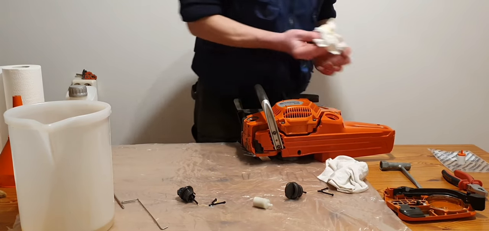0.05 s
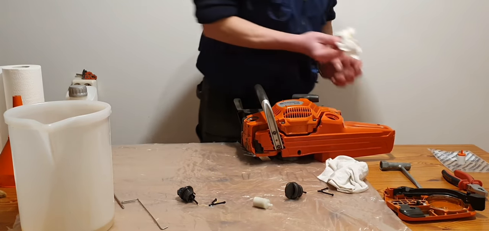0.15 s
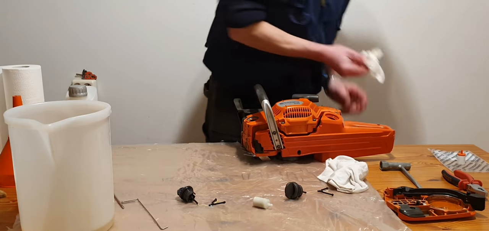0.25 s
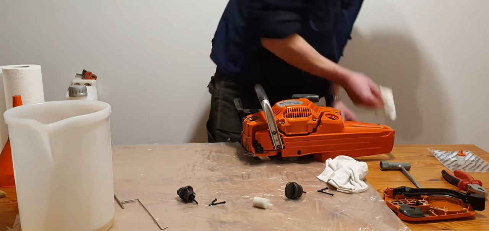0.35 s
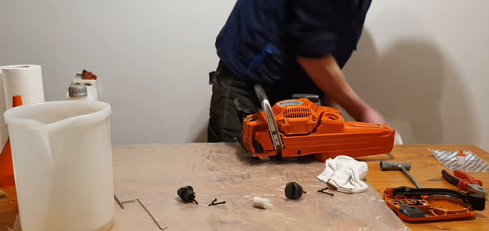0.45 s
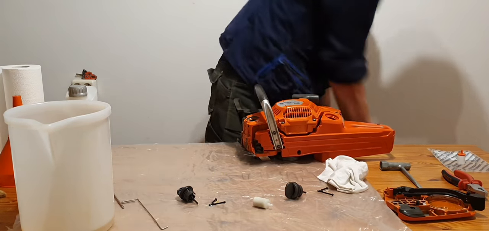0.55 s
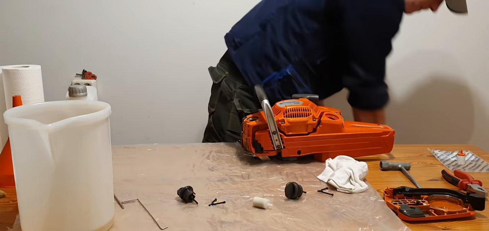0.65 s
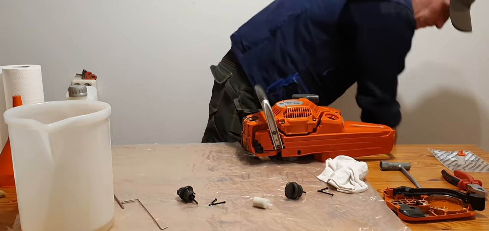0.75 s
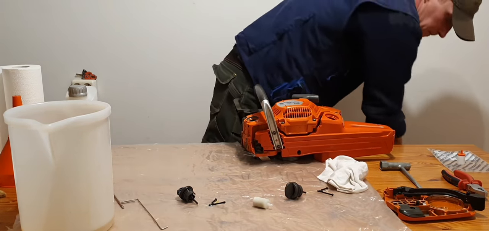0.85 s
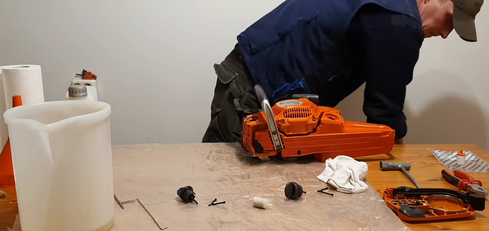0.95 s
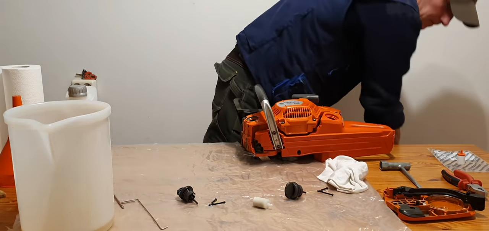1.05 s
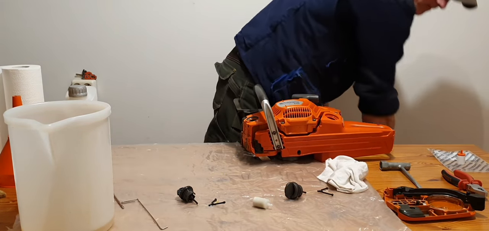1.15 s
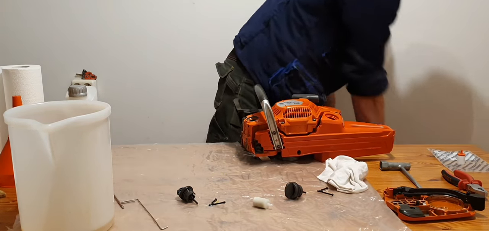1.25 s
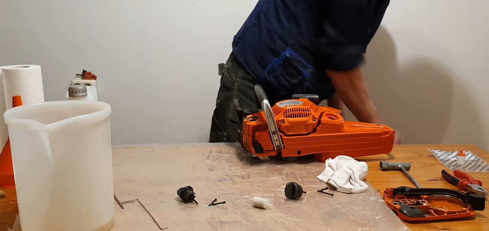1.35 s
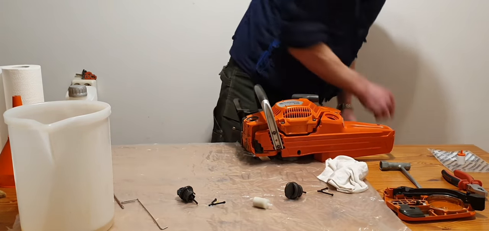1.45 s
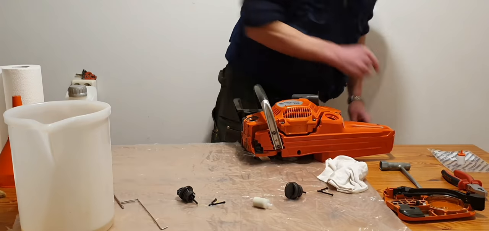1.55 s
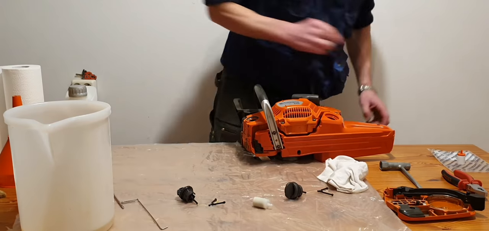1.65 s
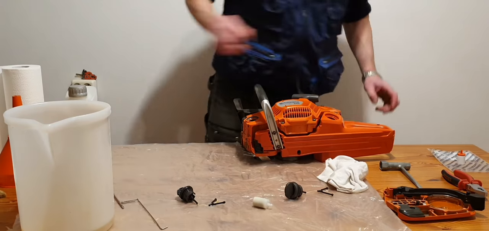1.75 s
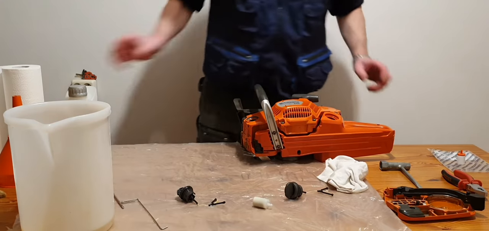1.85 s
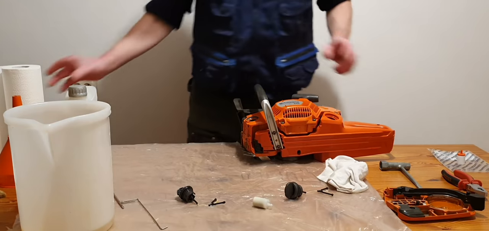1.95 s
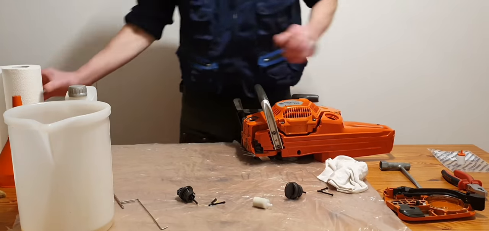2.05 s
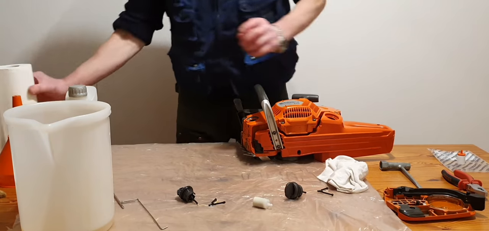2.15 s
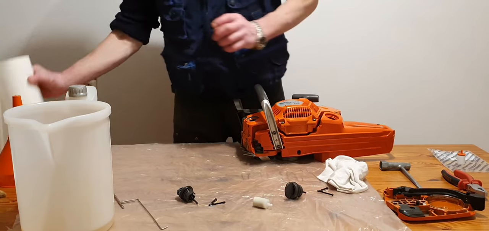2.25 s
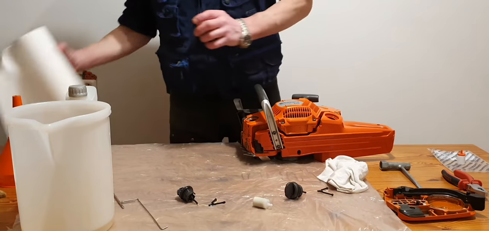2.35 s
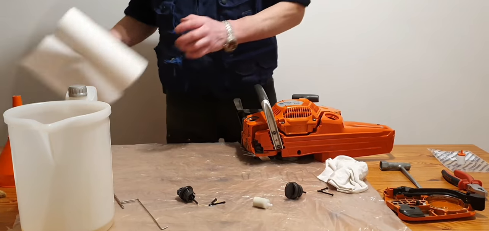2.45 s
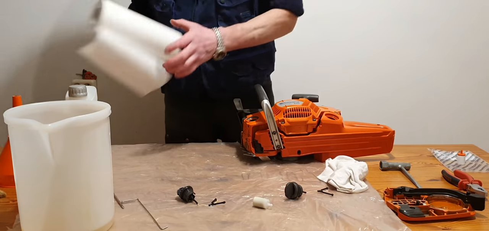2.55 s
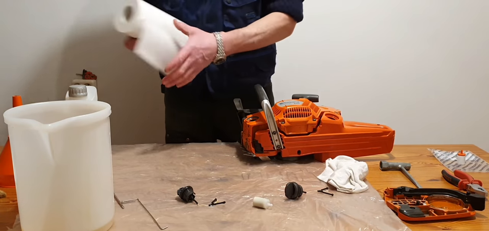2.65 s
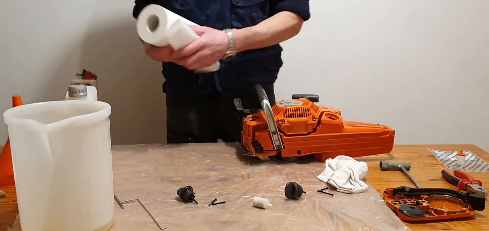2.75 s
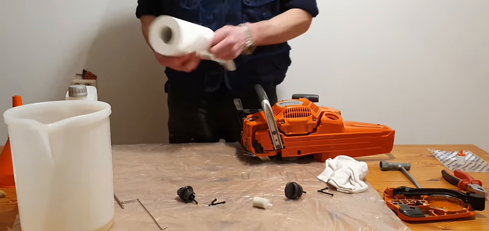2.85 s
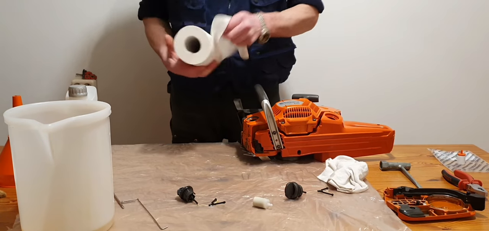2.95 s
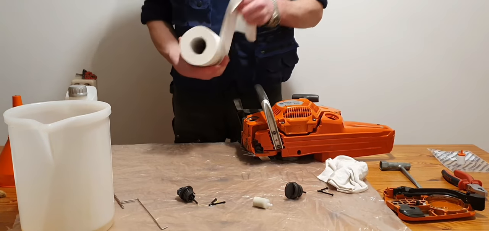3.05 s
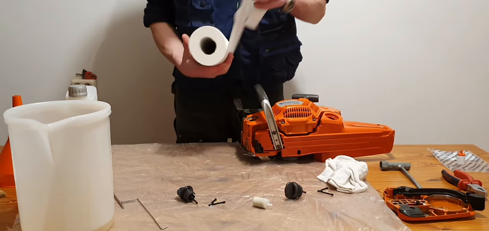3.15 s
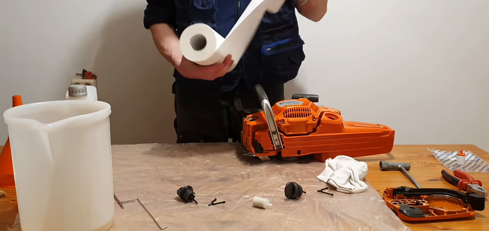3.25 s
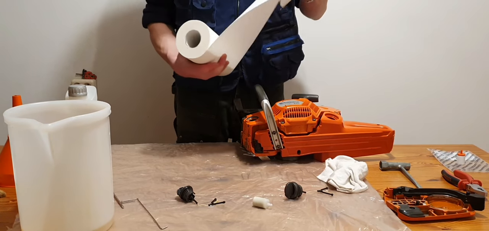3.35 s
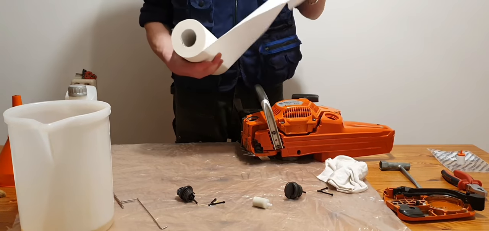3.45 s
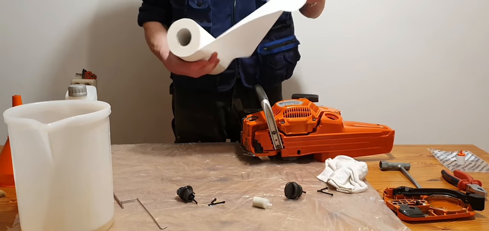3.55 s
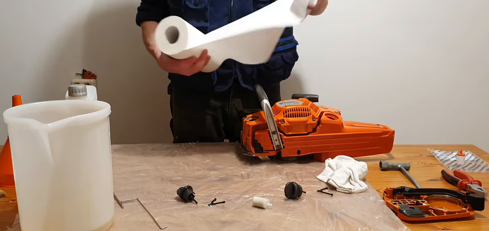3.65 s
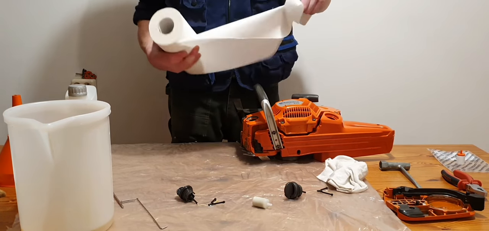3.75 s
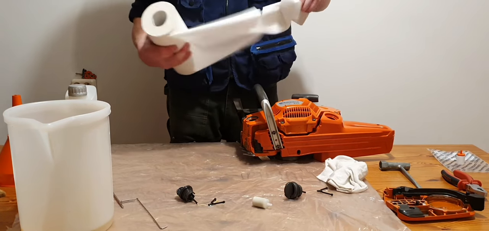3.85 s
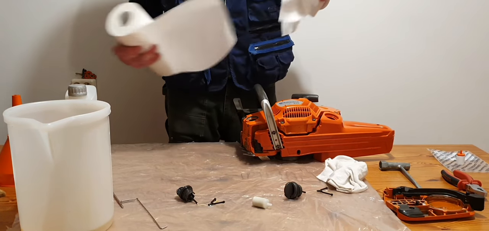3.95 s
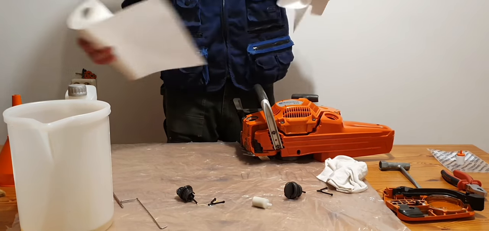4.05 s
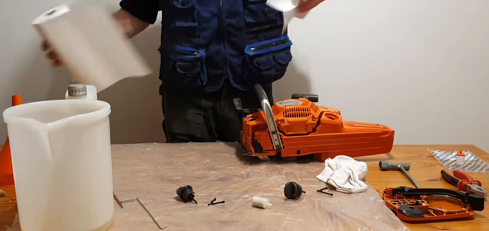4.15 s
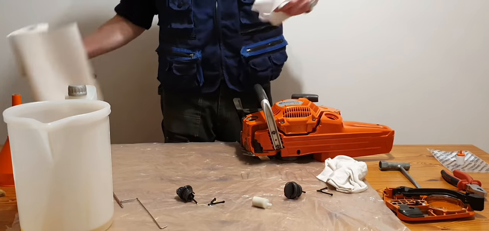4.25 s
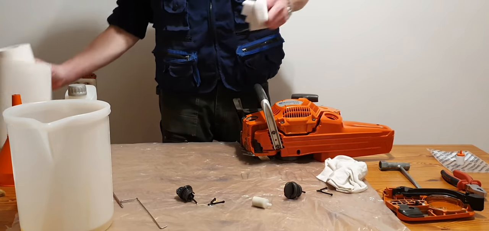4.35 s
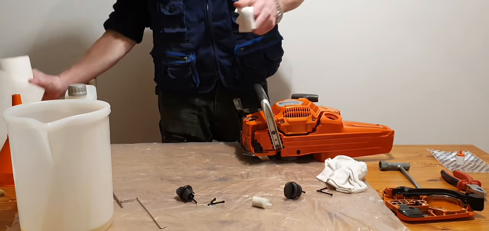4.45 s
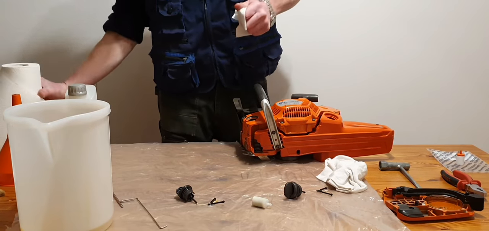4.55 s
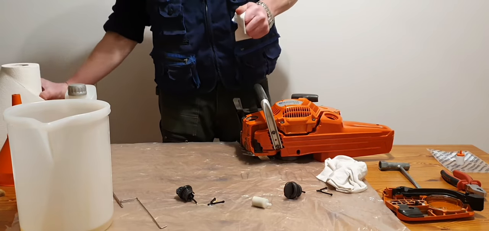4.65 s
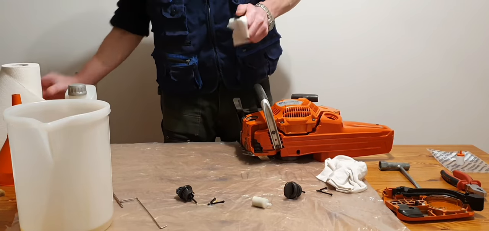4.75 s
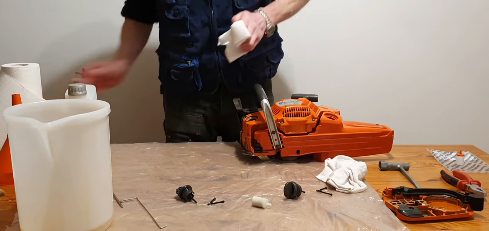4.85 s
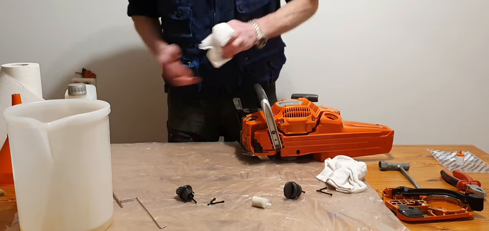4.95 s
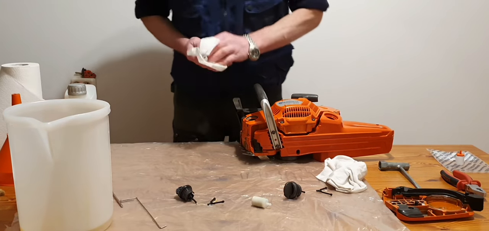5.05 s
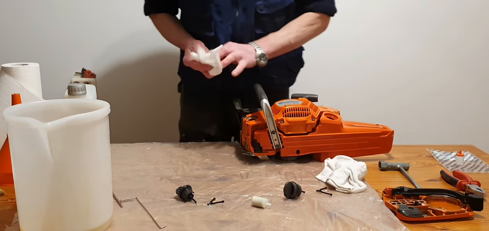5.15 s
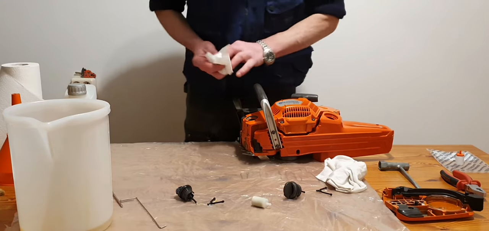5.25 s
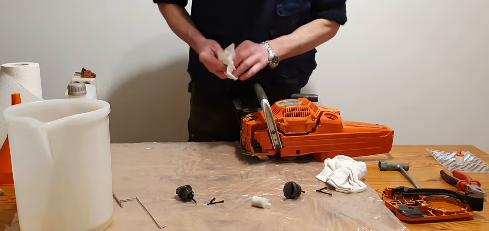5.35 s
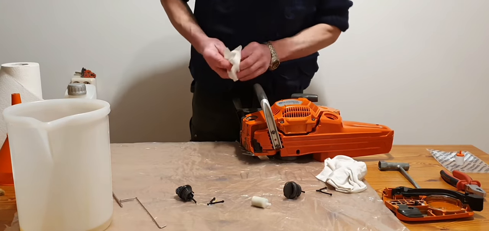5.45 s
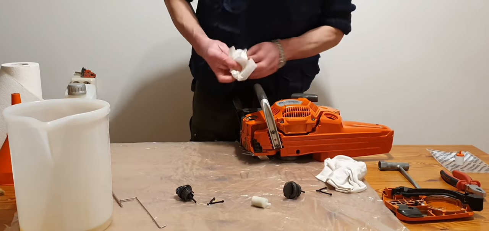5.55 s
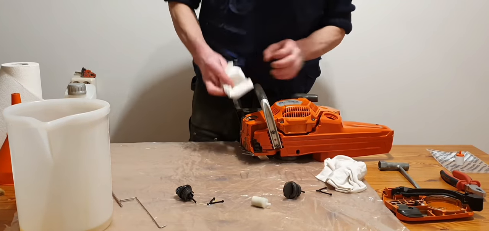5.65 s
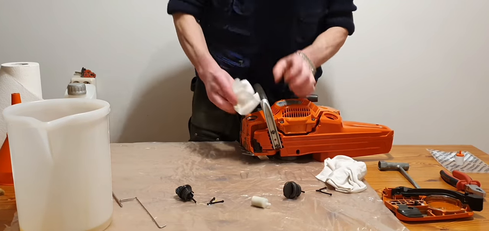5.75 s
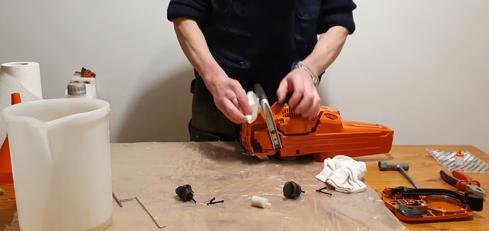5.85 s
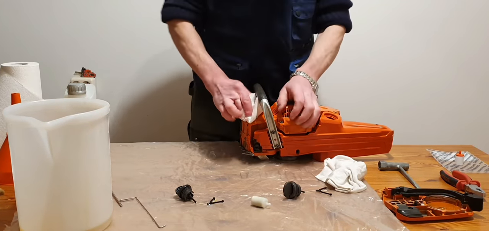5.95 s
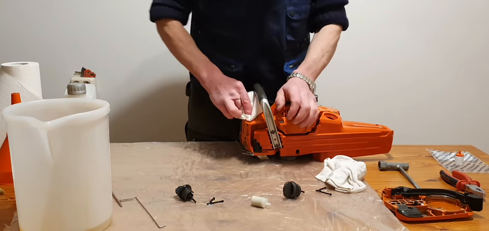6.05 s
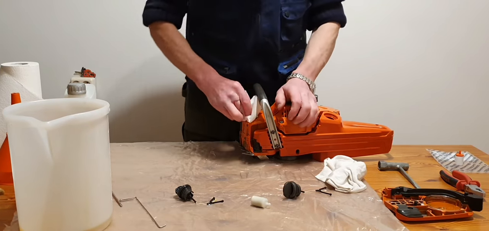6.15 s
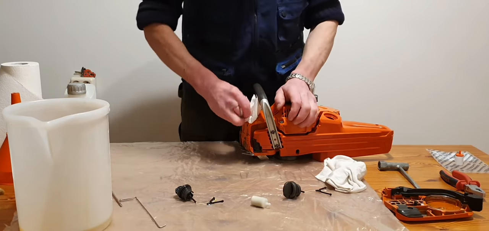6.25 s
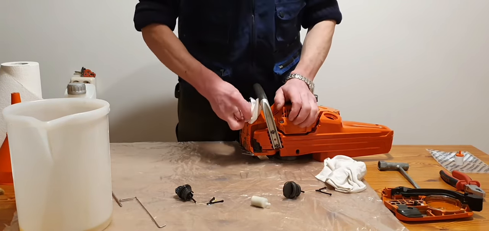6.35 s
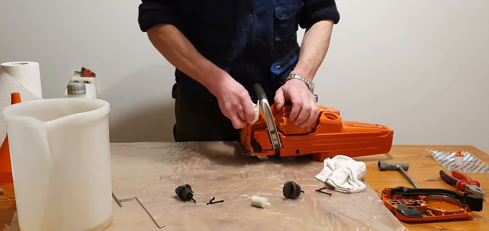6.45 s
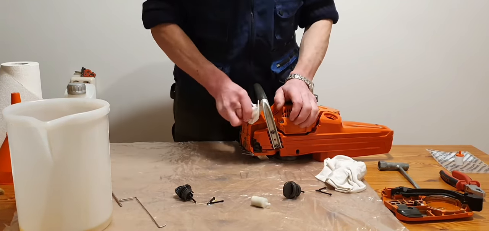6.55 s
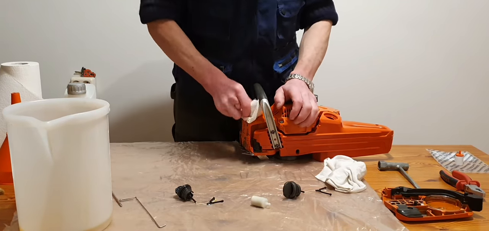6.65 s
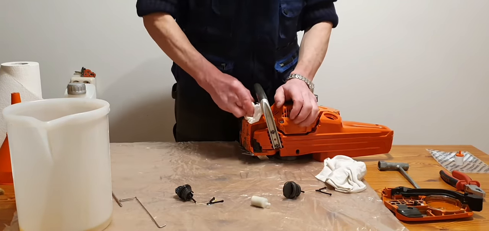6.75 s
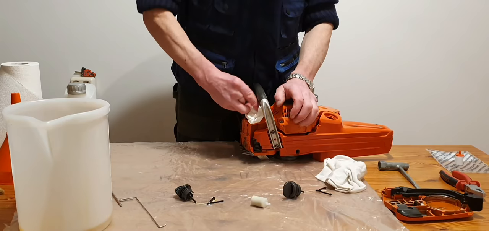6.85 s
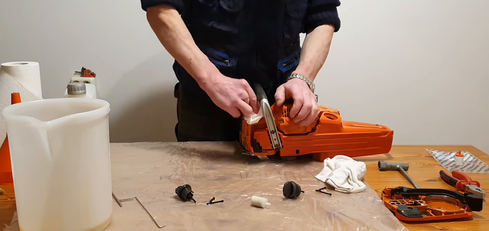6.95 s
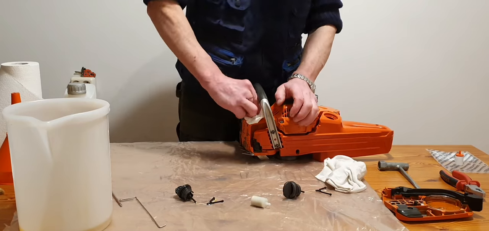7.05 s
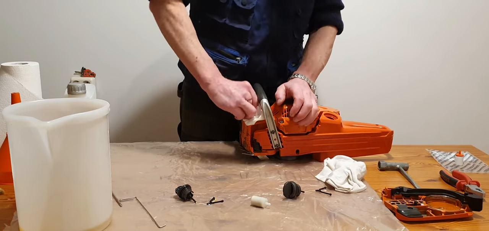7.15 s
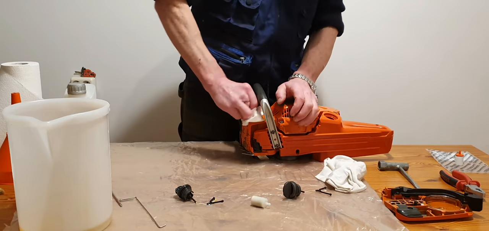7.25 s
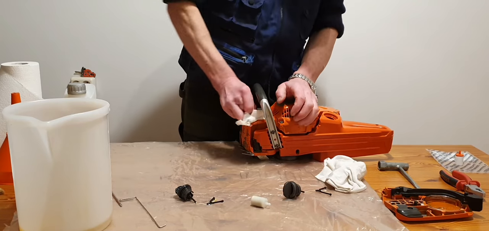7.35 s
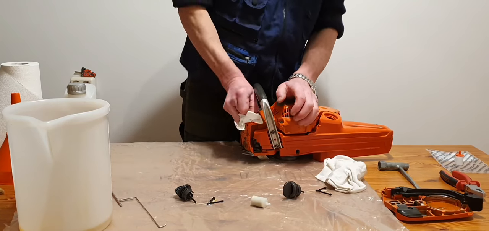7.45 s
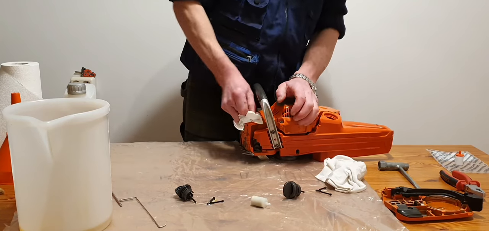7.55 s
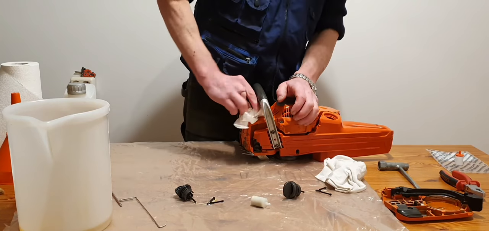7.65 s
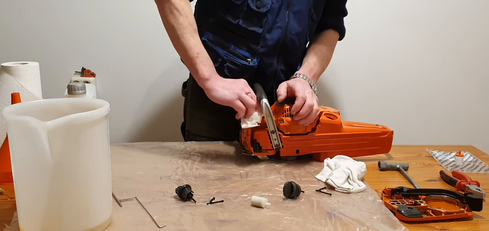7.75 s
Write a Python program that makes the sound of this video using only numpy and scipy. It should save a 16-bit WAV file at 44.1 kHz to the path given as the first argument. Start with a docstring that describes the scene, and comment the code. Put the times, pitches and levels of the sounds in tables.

```python
"""Workshop, in order of time: a faint steady hiss throughout; a jacket and sleeves swish (coloured snap trains).
Soft low bumps and rubs (swelling noise) are scattered throughout; a paper towel roll is turned, a sheet pulled.
At 3.8 s the sheet rips off: a noise burst, bridges breaking in a row, flapping. The sheet is gathered.
At 4.5 s the roll thumps onto the bench (soft pushes ring modes); folding goes on, then a wad wipes a chainsaw.
At 7.7 s the saw's plastic clacks (impulses ring modes). Bare walls return every sound but the hiss."""
import sys
import numpy as np
from scipy import signal
from scipy.fft import rfft, irfft, next_fast_len
from scipy.io import wavfile

SR = 44100
rng = np.random.default_rng(int(sys.argv[2]) if len(sys.argv) > 2 else 0)


def persist_wave(psi):
    """Save psi, clipped to +-1, as 16-bit WAV."""
    counts = np.round(np.clip(psi, -1, 1) * 32767).astype(np.int16)
    wavfile.write(sys.argv[1], SR, np.atleast_2d(counts).T)


N = 344421
T = np.arange(N) / SR  # s


def amp(db):
    """Decibels to gain."""
    return 10 ** (np.asarray(db) / 20)


def evened(x):
    """Scales to rms 1."""
    return x / np.sqrt(np.mean(x ** 2) + 1e-20)


def read(points, hz):
    """Reads a table along a log-frequency axis."""
    f, value = np.transpose(points)
    return np.interp(np.log(hz + 1), np.log(f), value)


def level(rows, column):
    """One dB column as a gain per sample, interpolated in dB, silent outside the table."""
    rows = np.array(rows)
    return amp(np.interp(T, rows[:, 0], rows[:, column], -np.inf, -np.inf))


def add(mix, start_s, sound):
    """Lays a sound into the mix at a time."""
    part = mix[round(start_s * SR):][:len(sound)]
    part += sound[:len(part)]


def colour(x, spectrum):
    """Minimum-phase filter of energy 1: clicks keep their sharp front."""
    hz = abs(np.fft.fftfreq(4096, 1 / SR))
    log_gain = np.log(amp(read(spectrum, hz)))
    response = np.exp(np.conj(signal.hilbert(log_gain)))
    taps = np.fft.ifft(response).real[:2048]
    return signal.oaconvolve(x, taps / np.linalg.norm(taps))[:N]


def snaps(per_s, spread_db):
    """Random train of tiny snaps at rms 1, most small and a few large."""
    chance, luck = rng.random((2, N))
    at = np.flatnonzero(chance < per_s / SR)
    luck = 2 * luck[at] - 1
    size_db = spread_db * np.minimum(-np.log(abs(luck)), 4)
    train = np.zeros(N)
    train[at] = np.sign(luck) * amp(size_db)
    return evened(train)


# left-right correlation: f/Hz, correlation/1
LIKENESS = [(60, 0.6), (130, 0.75), (290, 0.68), (640, 0.29), (1400, 0), (3000, 0.074), (7000, 0),
            (15000, 0)]


def pair(two):
    """Two unrelated signals become two ports: alike in the bass, unlike in the treble."""
    length = two.shape[1]
    size = next_fast_len(length)
    a, b = rfft(two, size)
    likeness = read(LIKENESS, np.fft.rfftfreq(size, 1 / SR))
    angle = np.arccos(np.clip(likeness, -1, 1)) / 2
    common, opposed = np.cos(angle) * a, np.sin(angle) * b
    return irfft([common + opposed, common - opposed], size)[:, :length]


# reverberation: f/Hz, t60/s
ROOM_T60_S = [(80, 0.32), (300, 0.53), (1000, 0.46), (3000, 0.39), (6000, 0.45), (10000, 0.26),
              (16000, 0.22)]


def room(x, wet_db, early_db=-3, early_s=0.0082):
    """Direct sound, quick reflections off bench and wall, and a tail decaying at its own rate per frequency."""
    t = T[:SR // 2]
    signs = rng.choice([-1., 1.], (2, len(t)))
    taps = signs * (rng.random((2, len(t))) < 4000 / SR) * (t > .001)  # 4000 echoes/s after 1 ms
    hz, frame_s, z = signal.stft(taps, SR, nperseg=256)
    decay = amp(-60 * frame_s / read(ROOM_T60_S, hz)[:, None])
    tail = signal.istft(z * decay, SR, nperseg=256)[1][:, :len(t)]
    tail = pair(tail * (1 + amp(early_db) * np.exp(-t / early_s)))
    tail = evened(tail) / np.sqrt(len(t))  # energy 1
    echoes = signal.fftconvolve(x[None], tail, axes=1)[:, :len(x)]
    return (x + amp(wet_db) * echoes) / np.hypot(1, amp(wet_db))


# hiss: f/Hz, relative density/dB per Hz
AIR = [(20, 6.5), (45, 0), (75, 4.5), (130, 0), (300, -4), (800, -5.5), (2000, -17), (4100, -13.5),
       (4500, -9), (4900, -14.5), (9800, -14.5), (11000, -25.5), (16000, -34)]


def air(left_db=-77.0, right_db=-72.5):
    """Steady coloured noise, partly common to both ports, stronger at the right."""
    noises = np.array([colour(noise, AIR) for noise in rng.standard_normal((2, N))])
    return amp([[left_db], [right_db]]) * pair(noises)


def moving(x, spectrum, wet_db, diffuse_db=0, fade_s=0.036):
    """A moving hand: some echo paths stay fixed, the rest keep changing and blur into a trailing wash."""
    energy = signal.lfilter([1], [1, -np.exp(-1 / (fade_s * SR))], x ** 2)
    noises = rng.standard_normal((2, N))
    wash = pair(np.array([colour(noise * np.sqrt(energy), spectrum) for noise in noises]))
    fixed = room(colour(x, spectrum), wet_db)
    return evened(evened(fixed) + amp(diffuse_db) * evened(wash))


# layer response to movement brightness, per layer: dB per dB
TILT = {"cloth": -0.78, "folds": -0.46, "creases": 0.066, "fibres": 0.71}


def movements(rows, attack_s, release_s, cloth_db, folds_db, creases_db, fibres_db):
    """Each movement swells, holds and dies away; returns the summed power per layer."""
    shares = {"cloth": cloth_db, "folds": folds_db, "creases": creases_db, "fibres": fibres_db}
    power = {layer: np.zeros(N) for layer in shares}
    for start_s, length_s, db, bright_db in rows:
        span = (T > start_s) & (T < start_s + length_s + 1)
        t = T[span] - start_s
        effort = np.minimum(t / attack_s, 1) * np.exp(-np.maximum(t - length_s, 0) / release_s)
        for layer, share_db in shares.items():
            gain = amp(db + share_db + TILT[layer] * bright_db)
            power[layer][span] += (effort * gain) ** 2
    return power


# layer colours: f/Hz, relative density/dB per Hz
FOLDS = [(150, -27), (500, -14), (800, -4.5), (1100, -2), (1700, 1.5), (2300, -4), (3200, -8),
         (5000, -26.5), (10000, -36.5)]
CREASES = [(600, -38), (1500, -11), (2300, -1), (2900, -0.5), (3900, -1), (5200, -7.5), (7000, -12.5),
           (10000, -28), (16000, -46)]
FIBRES = [(1000, -29), (3000, -3), (5000, 2), (7500, -1.5), (10000, -2.5), (12700, -7.5), (13600, -13.5),
          (16000, -18)]
CLOTH = [(30, -6), (70, -9.5), (130, -2), (200, -2.5), (350, 2), (550, 2.5), (850, 4), (1300, -6.5),
         (2200, -9.5), (5000, -34)]
# movements: start t/s, length/s, relative level/dB, brightness/dB
# jacket over itself; sleeves swinging; roll turned and sheet pulled; freed sheet folded; wad on saw
SLIDES = [(-0.05, 0.12, -69, -1.5), (0.27, 0.19, -69.5, 4), (0.45, .39, -68, -0.5), (0.665, 0.024, -60, -4),
          (1.2, 0.13, -81.5, -4), (1.44, 0.2, -83.5, 0), (1.58, .12, -79.5, -4), (1.8, 0.045, -79, -4),
          (1.93, 0.11, -70, -0.5), (2.03, .15, -67.5, -7), (2.2, 0.22, -69, -8.5),
          (2.39, 0.086, -67.5, -1.5)]
SWINGS = [(0.07, 0.2, -84, -13), (0.69, 0.18, -66, -3), (0.8, .07, -70.5, -4), (0.945, 0.084, -64, 0.5),
          (1.35, 0.26, -91, -19), (1.49, 0.076, -84.5, -14), (2.075, 0.13, -65, 5.5),
          (2.29, 0.12, -63.5, -6), (2.41, 0.14, -63, -1.5)]
PULLS = [(2.66, 0.066, -66.5, -11.5), (2.715, .07, -61, -5), (2.775, 0.06, -49.5, 0.5),
         (2.89, .1, -53.5, -5), (3.02, 0.17, -59, -1), (3.19, 0.11, -54.5, 0.5), (3.28, 0.1, -53.5, -3),
         (3.39, 0.052, -52.5, -0.5), (3.575, 0.19, -57.5, -1)]
CRUMPLES = [(3.945, 0.19, -55, -4), (4.11, .17, -53.5, -6), (4.29, 0.038, -55, 2),
            (4.435, 0.087, -52.5, -5), (4.645, 0.091, -64, 9), (4.78, .17, -63, -2),
            (4.972, 0.16, -52.5, -0.5), (5.09, 0.043, -49, -1.5), (5.23, 0.1, -60, -1.5),
            (5.34, 0.028, -62.5, 5.5), (5.475, .06, -56, 3.5), (5.635, 0.059, -56, 2),
            (5.785, 0.05, -53, 0.5)]
WIPES = [(5.91, 0.15, -59.5, -2), (6.06, 0.13, -62, -3.5), (6.22, 0.074, -64.5, 2),
         (6.335, 0.099, -60.5, -2), (6.465, 0.099, -61, 2), (6.575, 0.12, -58.5, -2),
         (6.73, 0.083, -58.5, -1.5), (6.85, 0.039, -56.5, -1), (7.045, 0.097, -63.5, -1),
         (7.165, 0.18, -62, -3.5), (7.28, 0.059, -61, -3), (7.49, 0.15, -62, -1), (7.63, 0.08, -64, -3),
         (7.73, 0.065, -63, 0)]


def rustle():
    """Folds bend, creases buckle, fibres hiss as they slide, cloth swishes; each movement kind has its blend."""
    layers = {
        "folds": moving(snaps(per_s=520, spread_db=4.5), FOLDS, wet_db=8.0, diffuse_db=-6.0),
        "creases": moving(snaps(per_s=600, spread_db=2.5), CREASES, wet_db=5.5, diffuse_db=1.0),
        "fibres": moving(snaps(per_s=2000, spread_db=4.5), FIBRES, wet_db=3.5, diffuse_db=4.0),
        "cloth": moving(snaps(per_s=3000, spread_db=5.0), CLOTH, wet_db=16, diffuse_db=-3.5),
    }
    kinds = [
        movements(SLIDES, attack_s=0.058, release_s=0.053,
                  cloth_db=-13, folds_db=-3.5, creases_db=-4, fibres_db=5.5),
        movements(SWINGS, attack_s=0.057, release_s=0.086,
                  cloth_db=0.5, folds_db=-1.0, creases_db=-0.5, fibres_db=-8.5),
        movements(PULLS, attack_s=0.052, release_s=0.081,
                  cloth_db=-2.0, folds_db=2.5, creases_db=1.5, fibres_db=-4.0),
        movements(CRUMPLES, attack_s=0.036, release_s=0.12,
                  cloth_db=-9.5, folds_db=-2.5, creases_db=1.5, fibres_db=-3),
        movements(WIPES, attack_s=0.042, release_s=0.083,
                  cloth_db=-8.0, folds_db=-2.0, creases_db=2.0, fibres_db=-3.5),
    ]
    out = 0
    for layer, sound in layers.items():
        out = out + sound * np.sqrt(sum(power[layer] for power in kinds))
    return out


def stroke(length_s, rise=0.31):
    """Envelope that peaks at 1 after rise * length and is down about 18 dB at the length."""
    u = T[:SR // 2] / (rise * length_s)
    return (u * np.exp(1 - u)) ** 2


# bumps: t/s, relative level/dB, length/s
NUDGES = [(0.31, -66.5, 0.11), (0.413, -64, 0.1), (2.152, -70, 0.12), (2.536, -60, 0.028),
          (2.805, -56.5, 0.14), (4.934, -61, 0.22), (5.806, -63, 0.14), (6.354, -76, 0.093),
          (6.84, -73, 0.075), (7.257, -51, 0.099), (7.3, -54.5, 0.12), (7.468, -64.5, 0.13)]
# bump colour: f/Hz, relative density/dB per Hz
BOOM = [(30, -9), (55, -6), (76, 10.5), (105, -15), (145, -4), (200, -3), (290, -19), (450, -15.5),
        (1000, -39), (4000, -56)]


def nudges():
    """Shifting weight and leaning on the bench make soft, low bumps of noise."""
    weight = np.zeros(N)
    for start_s, db, length_s in NUDGES:
        add(weight, start_s, amp(db) * stroke(length_s))
    return room(colour(weight * rng.standard_normal(N), BOOM), wet_db=-3.5)


# short rubs, mostly low, one bright: t/s, level/dB, f/Hz, length/s
RUBS = [(0.353, -69, 209, 0.27), (0.398, -69.5, 375, 0.11), (0.675, -60, 3500, 0.057),
        (1.388, -70, 196, 0.15), (1.423, -65, 410, 0.12), (2.148, -66, 392, 0.037),
        (2.348, -60.5, 360, 0.082), (2.46, -59.5, 174, 0.19), (2.814, -42.5, 324, 0.055),
        (3.15, -85, 156, 0.7), (3.651, -50.5, 342, 0.11), (4.956, -56.5, 433, 0.077),
        (5.661, -57, 480, 0.095), (5.798, -51.5, 375, 0.082), (5.96, -64.5, 250, 0.2),
        (6.112, -64.5, 326, 0.11), (6.322, -60.5, 266, 0.066), (6.861, -62.5, 444, 0.07),
        (7.303, -58, 275, 0.084), (7.548, -62, 290, 0.15), (7.607, -58.5, 430, 0.096)]


def rubs(width=0.28):
    """Short rubs of noise, each swelling around one broad pitch, mostly low, one bright."""
    out = np.zeros(N)
    for start_s, db, hz, length_s in RUBS:
        noise = rng.standard_normal(SR // 2)
        for q in (1 / width, 1):
            noise = signal.lfilter(*signal.iirpeak(hz, q, SR), noise)
        swell = stroke(length_s)
        noise_rms = np.sqrt(np.average(noise ** 2, weights=swell ** 2))
        add(out, start_s, amp(db) * swell * noise / noise_rms)
    return room(out, wet_db=-0.5)


# tear crossing the sheet: t/s, relative fibre level/dB, relative flap level/dB
RIP = [(3.787, -18, -46), (3.793, -31, -40), (3.803, -27, -50), (3.819, -25.5, -25.5), (3.835, -35, -28.5),
       (3.86, -35, -37.5), (3.885, -39, -44), (3.905, -58, -66)]
# taut edge giving way: t/s, relative level/dB, decay time constant/s
EDGE_SNAP = (3.787, -17.5, 0.0016)
# tear and flap colours: f/Hz, relative density/dB per Hz
TEAR = [(50, -15), (120, -4), (300, -4), (600, -6), (950, -5), (1250, -3), (2000, -3.5), (2800, -4.5),
        (3600, -8), (5200, -13.5), (7000, -20), (10000, -26.5), (13000, -30), (16000, -49)]
FLAP = [(35, -16), (70, 4), (125, -3), (180, 2.5), (320, 1), (550, 3.5), (780, -1), (1300, -2),
        (2500, -4.5), (6000, -30)]


def rip(bridges_per_s=330, jitter=.35, uneven=0.33, fray_db=-4):
    """The taut edge snaps, perforation bridges break one after another, fibres fray, the sheet flaps."""
    gaps_s = np.maximum(1 + jitter * rng.standard_normal(100), .1) / bridges_per_s
    at = np.ceil((RIP[0][0] + np.cumsum(gaps_s)) * SR).astype(int)
    breaks = np.zeros(N)
    breaks[at] = 1 + uneven * rng.uniform(-1.48, 1, len(at))
    breaks *= np.sqrt(SR / bridges_per_s)  # near rms 1 while they last
    fray = amp(fray_db) * snaps(per_s=6600, spread_db=4.5)
    tearing = (breaks + fray) * level(RIP, column=1)

    start_s, db, fade_s = EDGE_SNAP
    t = T[:SR // 50]
    burst = np.exp(-t / fade_s) * rng.choice([-1, 1], len(t))  # many fibres part at once
    add(tearing, start_s, amp(db) * burst)

    flap = colour(snaps(per_s=1400, spread_db=4) * level(RIP, column=2), FLAP)
    return amp(1.5) * room(colour(tearing, TEAR), wet_db=2.5) + amp(-1) * room(flap, wet_db=3.5)


def ring(push, modes):
    """A struck body answers with its dying modes."""
    t = T[:SR]
    answer = sum(amp(db - 60 * t / t60_s) * np.sin(2 * np.pi * hz * t) for hz, db, t60_s in modes)
    return signal.oaconvolve(push, answer)[:N]


def struck(hits, modes):
    """Single-sample knocks ring a light body."""
    push = np.zeros(N)
    for start_s, db in hits:
        add(push, start_s, amp([db]))
    return ring(push, modes)


# roll landing: t/s, impulse level/dB, contact time/s
BLOWS = [(4.491, -27.5, 0.0033), (4.5066, -13.5, 0.01), (4.541, -15.5, 0.01), (4.561, -28.5, 0.0058)]
# bench modes: f/Hz, relative level/dB, t60/s
BENCH = [(61.5, -18, 0.51), (88.6, -14, 0.59), (114.5, -20.5, 0.59), (140.9, 8.5, 0.49), (173, -17, 0.71)]
# roll end scuffing: t/s, relative level/dB
SETTLING = [(4.478, -41), (4.492, -34.5), (4.513, -30), (4.533, -32), (4.55, -42.5), (4.578, -37.5),
            (4.587, -33), (4.598, -40.5), (4.63, -53)]
# roll and core colour: f/Hz, relative density/dB per Hz
CORE = [(70, 0), (130, -13), (195, 2.5), (245, 0.5), (295, -2.5), (380, -4), (450, -0.5), (550, -10.5),
        (618, -8), (690, -14), (1000, -19.5), (1600, -32), (4000, -48)]
# cardboard core on bench: t/s, impulse level/dB
KNOCKS = [(4.5125, -31), (4.526, -34), (4.586, -41.5)]
# core modes: f/Hz, relative level/dB, t60/s
TUBE = [(290.6, -4, 0.29), (350, -5, 0.16), (442, -5.5, 0.19), (605, -3, 0.2), (750, -20, .08)]


def thump():
    """The roll lands on its rim and rocks flat: soft pushes ring the bench; the core scuffs, knocks, settles."""
    push = np.zeros(N)
    for start_s, db, contact_s in BLOWS:
        pulse = np.sin(np.pi * np.minimum(T[:SR // 20] / contact_s, 1)) ** 2
        add(push, start_s, amp(db) * pulse / pulse.sum())
    bench = room(ring(push, BENCH), wet_db=-14.5)
    scuff = colour(snaps(per_s=900, spread_db=0.5) * level(SETTLING, column=1), CORE)
    knocks = room(struck(KNOCKS, TUBE), wet_db=-7.0)
    return bench + amp(-1.0) * room(scuff, wet_db=4.5) + knocks


# saw rocking: t/s, impulse level/dB
CLACKS = [(7.6572, -44), (7.67, -48), (7.692, -63)]
# housing modes: f/Hz, relative level/dB, t60/s
HOUSING = [(692, -5, 0.055), (766, 3.5, 0.024), (1100, -9, 0.014), (2400, -25, .008)]


def clacks():
    """The saw's plastic housing knocks as it rocks."""
    return room(struck(CLACKS, HOUSING), wet_db=1.5)


# port balance: f/Hz, left minus right/dB
BALANCE = [(60, -3.5), (110, -2.5), (200, -4), (380, -5), (700, -7), (2400, -7.5), (4400, -5.6),
           (9000, -7.5), (12000, -6), (15000, -24)]


def scene():
    """All sources, louder at the right port, over the hiss."""
    hiss = air()
    sound = rustle() + nudges() + rubs() + rip() + thump() + clacks()
    size = next_fast_len(N)
    ratio = amp(read(BALANCE, np.fft.rfftfreq(size, 1 / SR)))
    gains = 2 * np.array([ratio, np.ones_like(ratio)]) / (1 + ratio)
    placed = irfft(rfft(sound, size) * gains, size)[:, :N]
    return placed + hiss


def record(dry, low_cut_hz=46, high_cut_hz=15900):
    """The microphone sheds the deepest bass; then the band limit."""
    highpass = signal.butter(4, low_cut_hz, "highpass", fs=SR, output="sos")
    thinned = signal.sosfilt(highpass, dry)
    lowpass = signal.firwin(511, high_cut_hz, window=("kaiser", 9), fs=SR)
    return signal.oaconvolve(thinned, lowpass[None], "same")


dry = scene()
out = record(dry)
persist_wave(out)
```